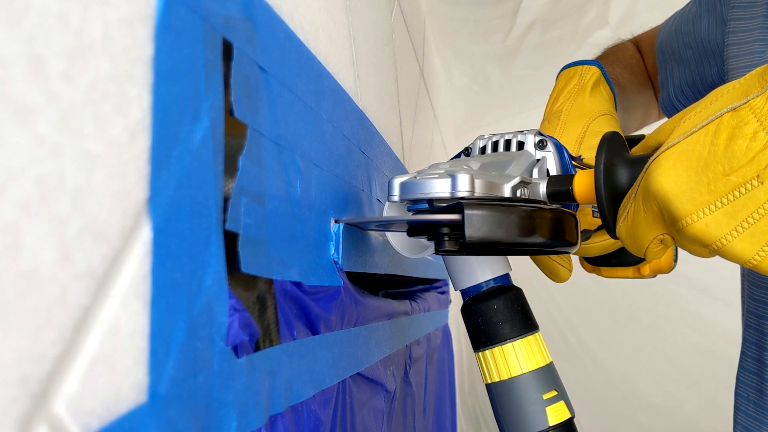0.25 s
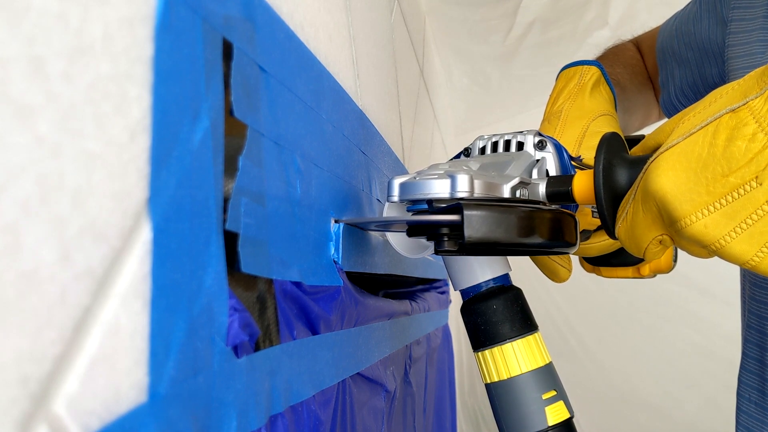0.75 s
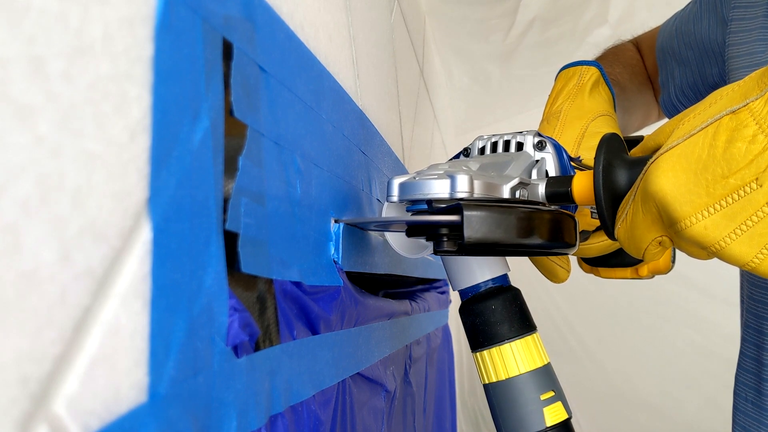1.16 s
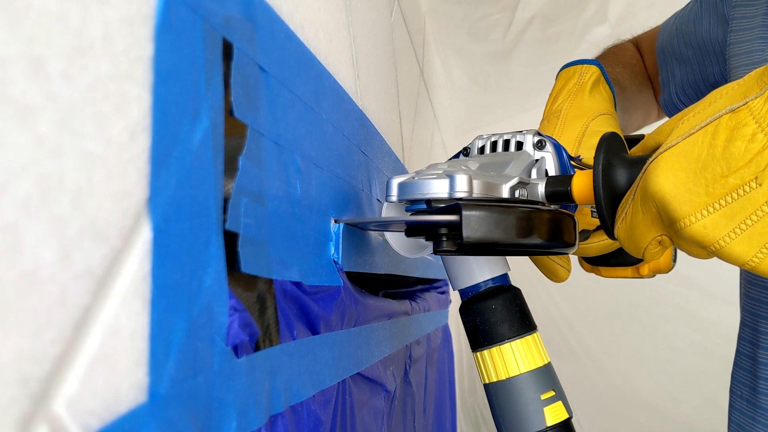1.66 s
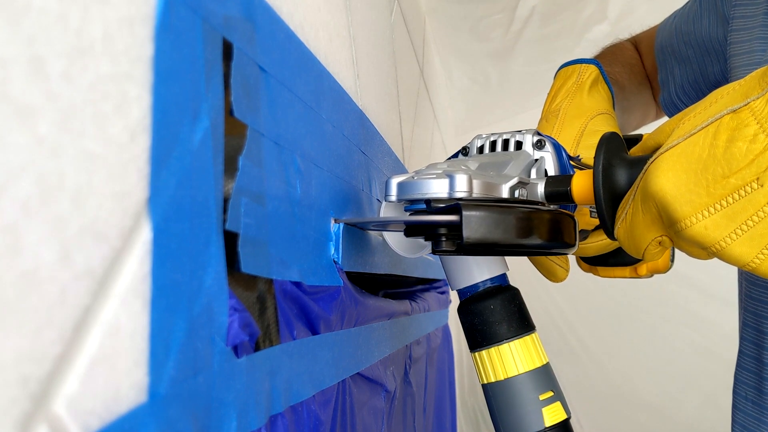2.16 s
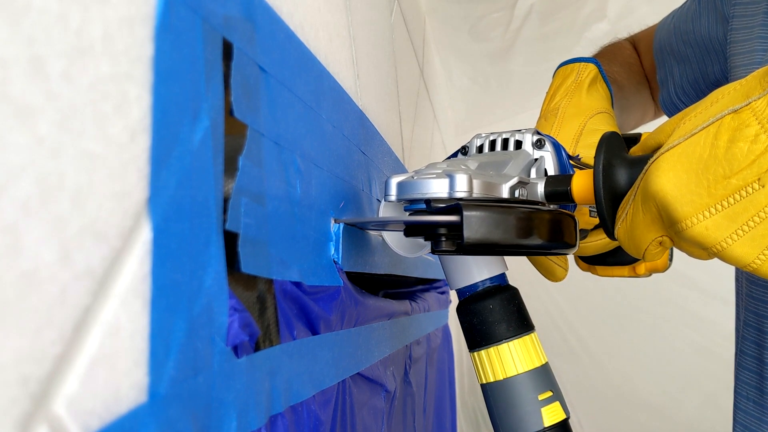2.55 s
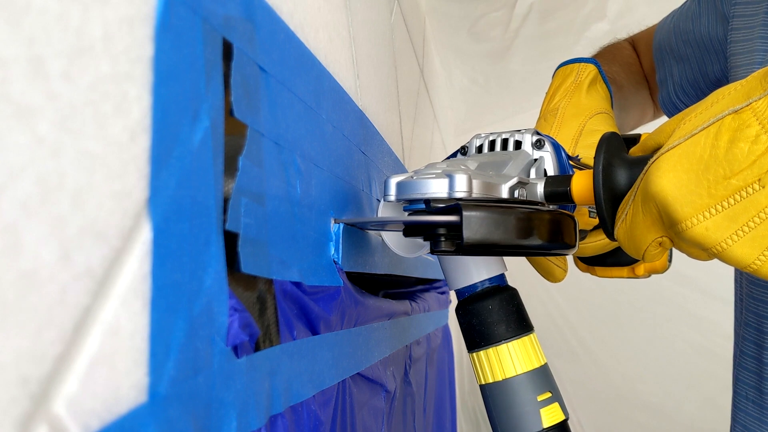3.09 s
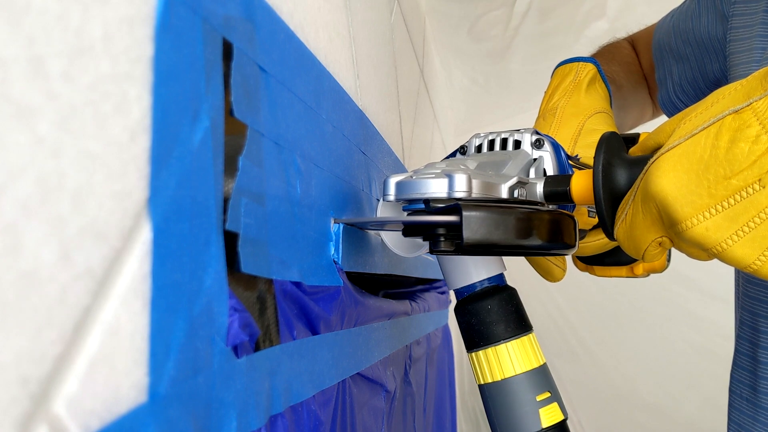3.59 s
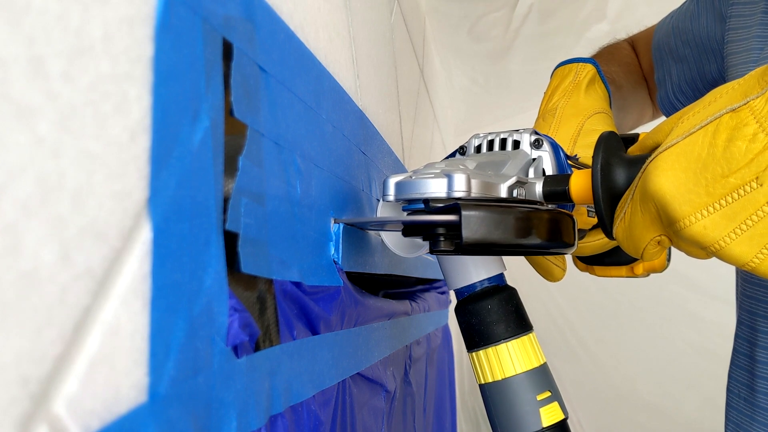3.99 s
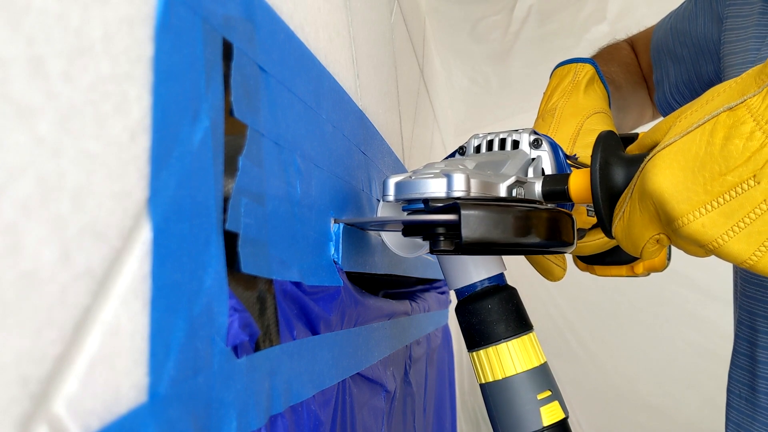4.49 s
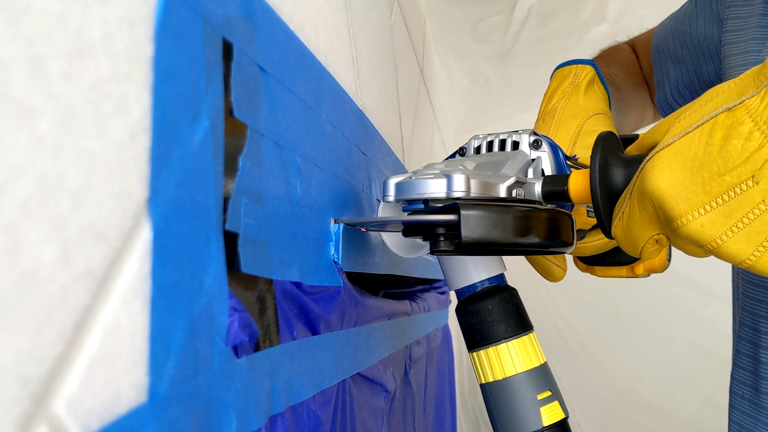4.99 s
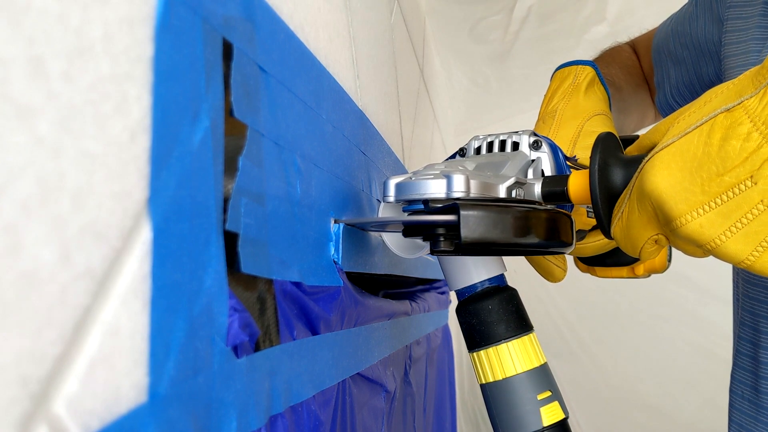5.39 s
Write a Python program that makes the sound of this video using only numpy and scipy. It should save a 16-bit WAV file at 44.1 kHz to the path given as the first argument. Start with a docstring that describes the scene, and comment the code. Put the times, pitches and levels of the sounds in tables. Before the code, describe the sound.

From 0 s an angle grinder is already cutting tile at full speed, close to a stereo microphone in a small room. The dominant sound is a harsh, bright, gritty screech: scraping makes the steel blade ring at many high pitches, strongest around 5.7 kHz, shimmering and fluttering irregularly. Underneath is a motor hum near 310 Hz and a rough buzz from knocks about 62 times a second, too fast to count, slightly stronger on the left. Thin steady whistles poke through, and a dust extractor adds a soft, low broadband air rush. The knocking buzz weakens after about 1.3 s. Around 2.8 s the pitch sags by roughly one percent as the blade bites, then slowly recovers by about 4 s, when the buzz grows firmer again. Near 5.4 s the scraping eases very briefly, then continues with a swelling ring until the abrupt end at about 5.6 s.

```python
"""Grinder cutting a tiled wall

A cordless grinder cuts tile in a small room, close to two microphone ports. Scraping grit, partly repeating
each turn, excites the resonant modes of the steel blade. Harmonics of the blade speed add up to the motor hum,
one knock a turn from the blade's high spot, and whistles; filtered noise is the air rush of a dust extractor."""
import sys
import numpy as np
from scipy import signal
from scipy.fft import rfft, irfft
from scipy.io import wavfile
from scipy.ndimage import map_coordinates

SR = 44100
rng = np.random.default_rng(int(sys.argv[2]) if len(sys.argv) > 2 else 0)


def wav_record(signal):
    """Record a signal, one row per channel, as 16-bit PCM in the file named by sys.argv[1]."""
    frames = np.transpose(np.atleast_2d(signal))
    bounded = np.clip(frames, -1, 1)
    # unit amplitude maps onto the largest positive 16-bit level
    quanta = np.round(bounded * 32767).astype(np.int16)
    wavfile.write(sys.argv[1], SR, quanta)


N = 248724
HZ = np.fft.rfftfreq(N, 1 / SR)
GEAR = 5  # motor turns to one blade turn, so also the order of the motor's line


def amp(db):
    """Level as an amplitude ratio: 20 dB is a factor of ten."""
    return 10 ** (np.asarray(db) / 20)


def evened(x):
    """Normalization to an rms value of 1."""
    return x / np.sqrt(np.mean(x ** 2) + 1e-20)


def read(points):
    """Spectral curve interpolated over log frequency at every bin."""
    hz, value = np.transpose(points)
    return np.interp(np.log(HZ + 1), np.log(hz), value)


def drift(top_hz, low_hz=0.201):
    """Slow random fluctuation of rms 1: sines of random phase, weaker towards high frequency."""
    coarse_t = np.arange(0, N + 64, 64) / SR
    hz = np.geomspace(low_hz, top_hz, num=24)[:, None]
    phase = hz * coarse_t + rng.random(hz.shape)  # cycles
    wave = (np.sin(2 * np.pi * phase) / np.sqrt(hz)).sum(0)
    return np.interp(np.arange(N) / SR, coarse_t, evened(wave))


def control():
    """Kinematics of the cut: integrated speed gives the blade angle in turns; strengths vary alongside."""
    # course of the cut: (time [s], knock strength [dB], scraping strength [dB],
    # swell of the motor hum [dB], swell of the loudest ring [dB])
    cut = [(0, -30.5, -17, 1, 0), (.6, -30.5, -16, 0, 2), (1.3, -33.5, -16.5, .5, 1),
           (2.1, -33, -16, 1.5, -1), (2.7, -35, -16.3, -1, 2), (3.1, -34, -16.5, 0.5, 0.5),
           (3.65, -33.5, -16.5, 1, 0), (4.0, -29.5, -16.5, 1, 0), (4.9, -30, -17, -0.5, 0.5),
           (5.64, -30, -17, -1.5, 3)]
    # motor speed, bogging down once as the blade bites and slowly catching up: (time [s], speed [turns/s])
    speed = [(0, 310.45), (1.85, 310.5), (1.95, 310.15), (2.7, 310.2), (2.85, 307.6), (3.0, 309.15),
             (3.75, 309.7), (3.95, 310.4), (5.64, 310.35)]
    t = np.arange(N) / SR
    motor_speed = np.interp(t, *np.transpose(speed))
    turns = np.cumsum(motor_speed) / SR / GEAR + .02
    times, *curves = np.transpose(cut)
    knock_db, scrape_db, hum_db, ring_db = (np.interp(t, times, curve) for curve in curves)
    # the hand eases off for a moment
    ease_s, ease_length_s, ease_db = 5.42, 0.086, -1.5
    scrape_db = scrape_db + ease_db * np.exp(-((t - ease_s) / ease_length_s) ** 2)
    return turns, knock_db, scrape_db, hum_db, ring_db


def rim(turns, memory):
    """Periodic excitation with memory: rim roughness of which each turn keeps a share of the last."""
    places = 768  # points round the rim
    fresh = rng.standard_normal((int(turns[-1]) + 3, places))
    worn = signal.lfilter([1], [1, -np.clip(memory, 0, .95)], fresh, axis=0)
    return evened(map_coordinates(worn.ravel(), [turns * places], order=3))


def scrape(turns):
    """Random excitation spectrum: the rim's own pattern for coarse bumps, fresh grit for fine ones."""
    # how much of the scraping the rim repeats: (frequency [Hz], share [0-1])
    repeat = [(2000, 0.88), (4500, 0.71), (7000, 0.69), (10000, 0.26), (15000, .1)]
    share = np.clip(read(repeat), 0, 1)
    repeated = share * rfft(rim(turns, 0.5))
    return repeated + np.sqrt(1 - share ** 2) * rfft(rng.standard_normal(N))


def blade(turns, scrape_db, ring_db):
    """Modal resonance: scraping rings each mode, which swells on its own and throbs as the blade turns."""
    # blade modes: (frequency [Hz], width [Hz], relative left level [dB], relative right level [dB],
    # left leads by [rad], left-right likeness [0-1])
    modes = [(3340, 160, -15, -16, 0.2, 0.45), (3480, 130, -7, -10, 0.7, 0.67),
             (3970, 180, -12, -16, 0.9, 0.34), (4160, 100, -6, -8, -1.3, 0.23),
             (4650, 150, -11, -12, -0.8, 0.26), (4910, 50, -19, -15, -2.9, 0.1),
             (5330, 60, -23, -26, 1.9, 0.06), (5520, 90, -14, -16, 0.0, 0.3), (5650, 70, 0, -1, 2.7, 0.76),
             (5790, 60, -6, -9, -0.8, 0.44), (6800, 130, -9, -11, 1.9, 0.55),
             (7750, 320, -13, -16, -0.2, 0.34), (7830, 70, -21, -11, -0.8, 0.11),
             (8160, 60, -13, -17, -0.5, 0.31), (8920, 300, -11, -13, -2.9, 0.28),
             (9280, 70, -10, -13, -0.5, 0.2), (9740, 170, -13, -14, 2.1, 0.05),
             (9950, 140, -8, -10, -0.4, 0.51), (10880, 130, -15, -17, 0.7, 0.23),
             (11250, 140, -10, -13, -1.8, 0.23), (11730, 430, -14, -14, -1.0, 0.12),
             (12110, 180, -15, -11, -0.8, 0.28), (12770, 110, -17, -14, 0.8, 0.36),
             (13100, 440, -18, -17, -2.7, 0.16), (13860, 150, -9, -8, 2.3, 0.22),
             (14140, 130, -12, -12, 2.6, 0.3), (14730, 60, -8, -9, 2.8, 0.36),
             (15100, 220, -12, -16, -0.5, 0.22), (15710, 90, -17, -22, 2.4, 0.19)]
    # scraping between the modes: (frequency [Hz], relative level [dB per Hz])
    grit_curve = [(1200, -37), (2000, -31.5), (3000, -19.5), (4500, -21), (6300, -24.5), (8400, -31),
                  (10500, -28), (12400, -65), (15700, -31)]
    loudest_hz = 5700
    angle = 2 * np.pi * turns
    # neighbouring modes get independent scraping, so they do not cancel
    scrapings = [scrape(turns) for _ in range(7)]
    radiates = 1 / (1 + (2750 / (HZ + 1)) ** 6)  # a small disc sends out little bass
    out = np.zeros((2, N))
    for k, (hz, width, left_db, right_db, lead, same) in enumerate(modes):
        shared = scrapings[k % len(scrapings)]
        apart = scrapings[(k + 3) % len(scrapings)]
        resonance = np.exp(2j * np.pi * rng.random()) / (1 + 2j * (HZ - hz) / width)
        right = (same * shared + np.sqrt(1 - same ** 2) * apart) * np.exp(-1j * lead)
        pair = np.array([amp(left_db) * shared, amp(right_db) * right])
        ring = irfft(radiates * resonance * pair, N)
        swell_db = ring_db * (abs(hz - loudest_hz) < 200)
        throb_db = .9 * np.cos(angle - 1.8 + .6 * rng.standard_normal())
        out += ring * amp(swell_db + throb_db + 1.21 * drift(30., 2.5))
    grit = irfft(amp(read(grit_curve)) * np.array([scrape(turns), scrape(turns)]), N)
    grit_throb_db = 0.42 * np.cos(angle - 1.5)
    grit_pan_db = np.array([[.7], [-.7]])
    out += grit * amp(1.18 * drift(40., 2.5) + grit_throb_db + grit_pan_db)
    return amp(scrape_db + 4) * evened(out)


def tones(turns, knock_db, hum_db):
    """Fourier synthesis: orders above the motor's line up into one knock a turn and follow its strength."""
    # turning blade and motor: (multiple of the blade speed, left rms level [dB], right rms level [dB],
    # left leads by [rad], gain per dB of knock strength [dB])
    orders = [(1, -57, -56, -0.3, -0.3), (2, -47, -48, -0.3, 0.3), (3, -58, -56, -0.7, 0.2),
              (4, -48, -47, -1.1, 0.7), (5, -33, -36, -0.7, -0.1), (6, -41, -49, -0.6, 0.5),
              (7, -40, -49, -0.3, 0.1), (8, -42, -49, 0.3, -1.1), (9, -37, -47, -1.4, -0.2),
              (10, -33, -42, -1.4, 1.2), (11, -41, -49, -2.7, 0.5), (12, -37, -45, -0.6, 0.4),
              (13, -40, -45, -0.3, 1.1), (14, -39, -44, 0.0, 1.7), (15, -48, -44, -0.0, 1.3),
              (16, -41, -45, 0.9, 2.2), (17, -40, -53, -0.6, 1.7), (18, -42, -45, 1.7, 1.2),
              (19, -52, -50, 2.0, 1.3), (20, -49, -45, -0.5, 1.9), (21, -53, -54, 0.9, 0.1),
              (22, -46, -53, 1.5, -0.3), (23, -49, -54, 2.1, 0.0), (24, -54, -55, -0.2, 0.8),
              (26, -53, -55, 0.1, 1.0), (28, -50, -58, -0.6, 1.7), (30, -55, -54, 2.8, 1.1),
              (33, -53, -54, -0.5, 2.5), (34, -52, -56, -0.8, 2.0)]
    # orders that stand out of the scraping as whistles, same columns
    whine = [(46, -42, -44, -.1, .5), (56, -38, -39, .5, 0), (57, -37, -41, .9, 0), (64, -38, -40, 1.2, 0),
             (67, -34, -38, -.6, 0), (65, -41, -43, .3, 0), (73, -41, -43, .2, 0), (91, -33, -34, 2.7, 0),
             (92, -32, -37, 2.4, 0), (94, -41, -42, -.8, 0)]
    out = np.zeros((2, N))
    strength_db = knock_db - knock_db.mean()
    # in turns: a harder knock comes at another spot of the turn
    shift = 0.0032 * drift(12.) - 0.0079 * strength_db
    loose = amp(-.8 * strength_db)  # a weak knock is less of one piece
    for k, left_db, right_db, lead, follows in orders + whine:
        above = max(k - GEAR - 1, 0)
        # phase grows as the order squared: the knock falls in pitch as it rings out
        sweep = .03 * above ** 2 - (1.5 if k > GEAR else .3)
        # fixed random phase of each order makes the knock less compact
        scatter = .6 * rng.standard_normal() * (k > GEAR)
        jitter = 0.012 * k * loose * drift(11.0)
        angle = 2 * np.pi * (k * turns + above * shift) + sweep + scatter + jitter
        swell_db = follows * strength_db + (k == GEAR) * hum_db
        flutter_db = (0.68 + 0.045 * k) * drift(15., 1.5)
        size = np.sqrt(2) * evened(amp(swell_db + flutter_db))  # peak of a sine of rms 1
        out += size * amp([[left_db], [right_db]]) * np.cos(angle - np.array([[0], [lead]]))
    return out


def extractor():
    """Broadband flow noise, partly coherent between the ports: air in the hose and round the guard."""
    # spectrum of the air: (frequency [Hz], relative level [dB per Hz])
    air_curve = [(15, 0), (40, -11), (90, -7.5), (200, -4), (400, -1), (700, -0.5), (1200, 1.5),
                 (2000, -4.5), (4000, -14), (9000, -37)]
    # coherence of the two ports: (frequency [Hz], left-right likeness [0-1])
    air_same = [(30, .3), (150, 0.41), (500, 0.17), (1200, 0.42), (2500, 0.11)]
    # balance: (frequency [Hz], left minus right [dB])
    air_pan = [(30, 9), (150, 3.5), (600, 6.5), (2500, 0.5)]
    a, b = rfft(rng.standard_normal((2, N)))
    same = np.clip(read(air_same), 0, 1)
    half_pan = amp(read(air_pan) / 2)
    right = same * a + np.sqrt(1 - same ** 2) * b
    pair = np.array([a * half_pan, right / half_pan])
    flutter = amp(.7 * drift(10., 1.5))
    rush = evened(irfft(pair * amp(read(air_curve)), N))
    return amp(-33.5) * flutter * rush


def scene():
    """Superposition of grinder tones, ringing blade and air."""
    turns, knock_db, scrape_db, hum_db, ring_db = control()
    return tones(turns, knock_db, hum_db) + blade(turns, scrape_db, ring_db) + extractor()


def record(dry):
    """Saturation and band limit: peaks round off softly in the input stage, then a low-pass filter."""
    soft = np.tanh(dry / 1.15) * 1.15
    edge_hz = 15740
    lowpass = signal.firwin(1023, edge_hz, window=("kaiser", 9), fs=SR)
    return signal.oaconvolve(soft, lowpass[None], "same")


dry = scene()
out = record(dry)
wav_record(out)
```